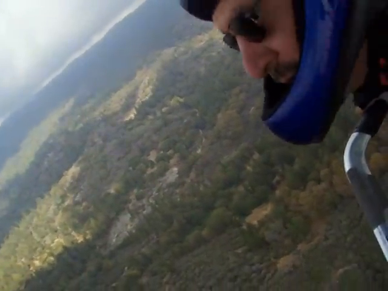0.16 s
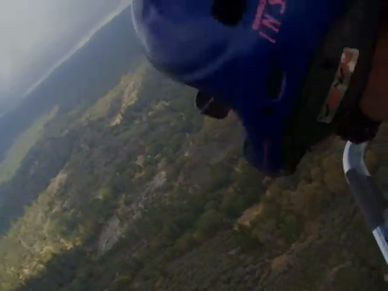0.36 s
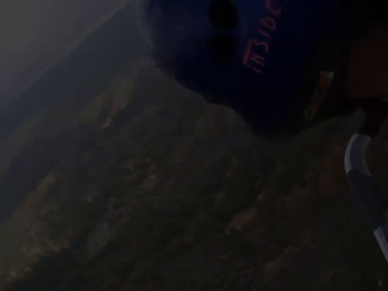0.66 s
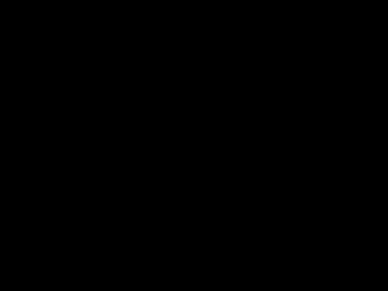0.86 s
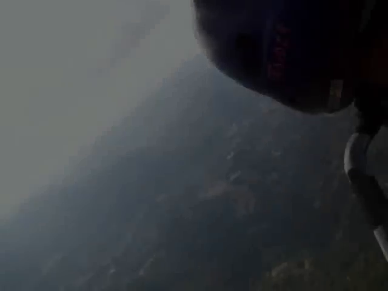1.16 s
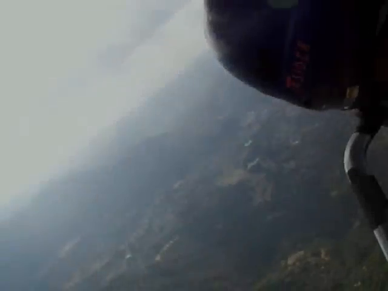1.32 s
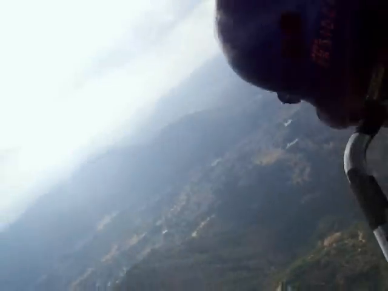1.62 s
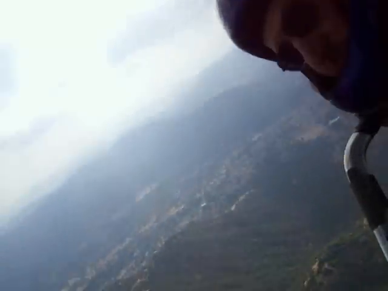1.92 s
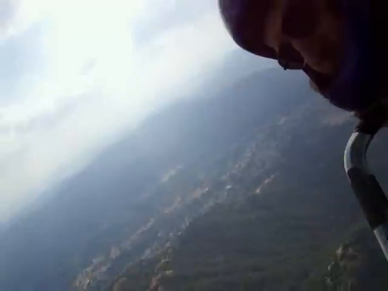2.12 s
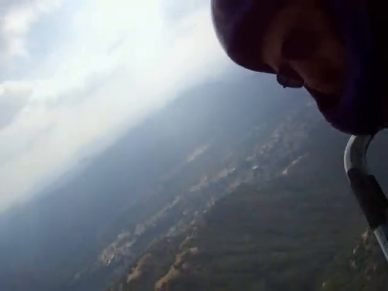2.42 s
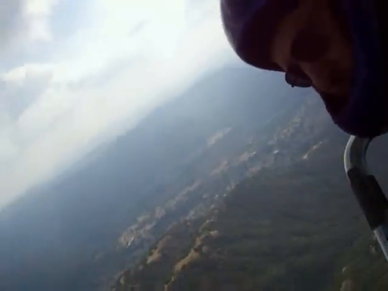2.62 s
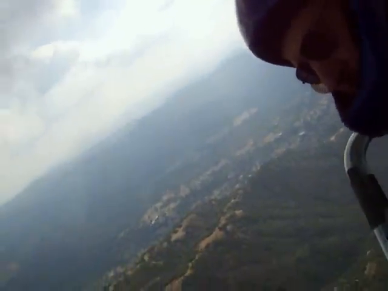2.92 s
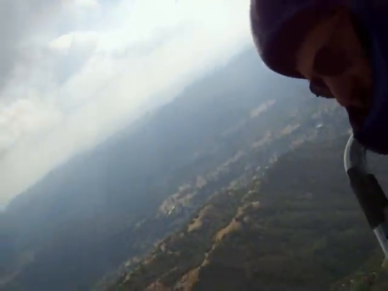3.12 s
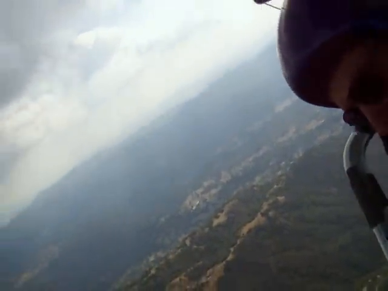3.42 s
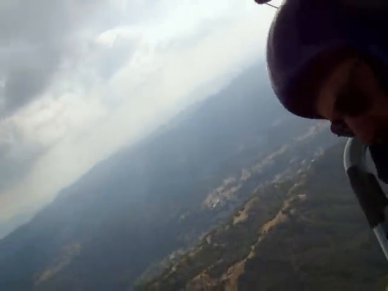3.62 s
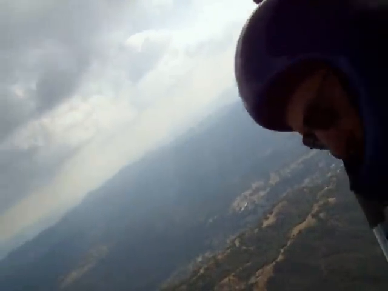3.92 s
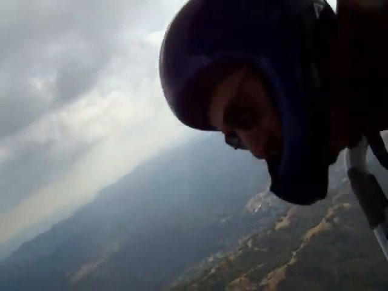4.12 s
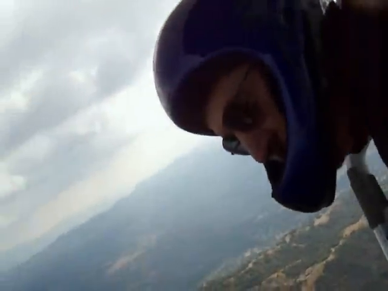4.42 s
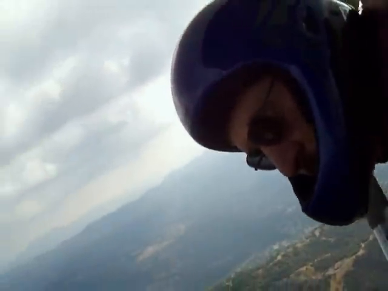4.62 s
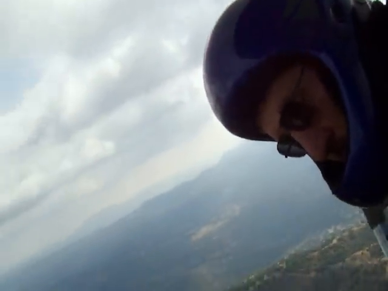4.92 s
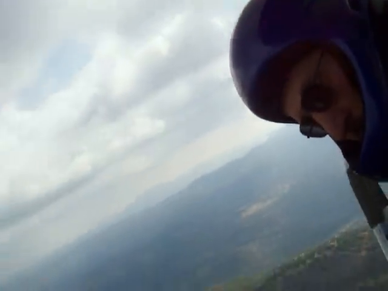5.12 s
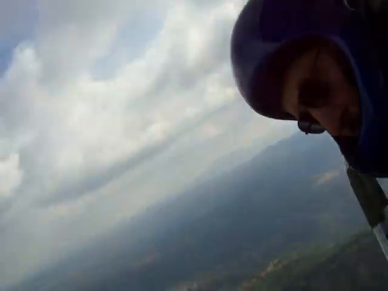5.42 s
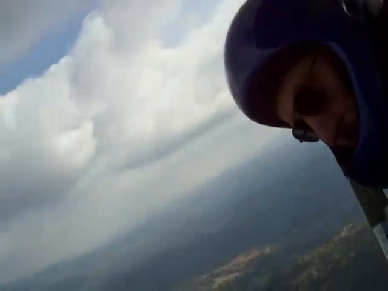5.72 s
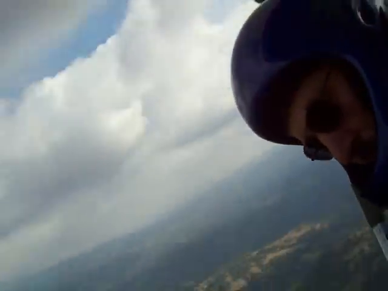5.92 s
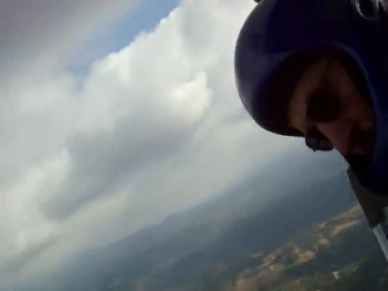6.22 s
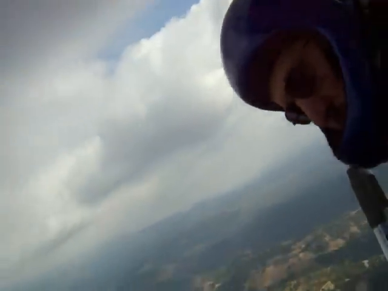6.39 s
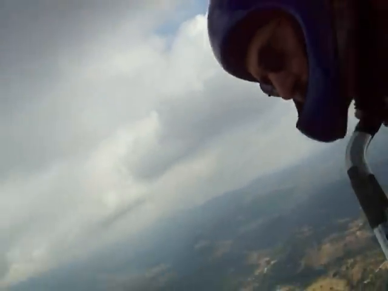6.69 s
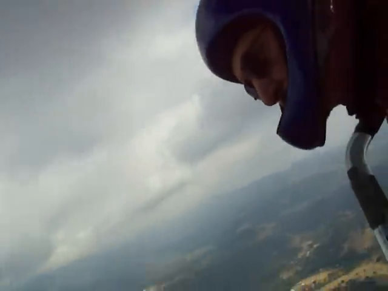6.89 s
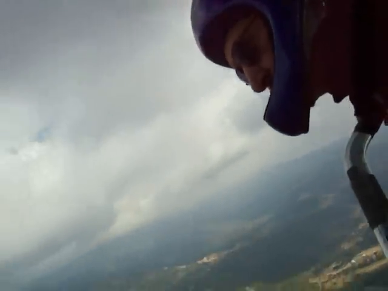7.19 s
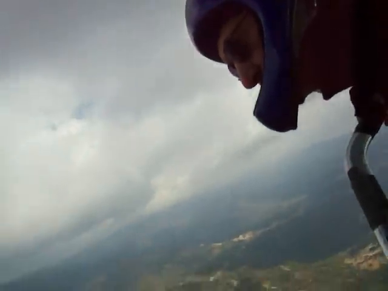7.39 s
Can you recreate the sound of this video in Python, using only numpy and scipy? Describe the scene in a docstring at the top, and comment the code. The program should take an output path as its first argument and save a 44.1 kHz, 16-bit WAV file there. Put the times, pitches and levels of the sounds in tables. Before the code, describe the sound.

Gusty airflow rumbles, rushes and hisses directly against a microphone on a hang glider in open air. Short hooting blips and occasional hard pops break through, with one dry tick early and a faint wire whistle after it. From about halfway the buffeting gets heavier and the pops crowd together, each momentarily choking the wind. A very short howl comes near the end, and the camera's faint high whine persists throughout.

```python
"""On a hang glider in flight, airflow buffets a camera's microphone: rumble, rush and hiss.
A rigging wire whistles faintly, one gust howls across a hollow of the housing, and there is one dry tick.
Eddies make the microphone port hoot for a few cycles, and the hardest ones slam the diaphragm.
Each slam chokes the microphone for an instant; on high peaks the gain control ducks the whole sound,
even the camera's thin whine, and swells back."""
import sys
import numpy as np
from scipy import signal
from scipy.fft import rfft, irfft, next_fast_len
from scipy.io import wavfile
from scipy.ndimage import minimum_filter1d, map_coordinates

SR = 44100
rng = np.random.default_rng(int(sys.argv[2]) if len(sys.argv) > 2 else 0)


def unload_wav(signal):
    """Save mono or channel-first audio to the path in sys.argv[1] as 16-bit WAV at rate SR, clipped to [-1, 1]."""
    wavfile.write(
        sys.argv[1],
        SR,
        np.round(np.clip(np.atleast_2d(signal).T, -1, 1) * 32767).astype(np.int16),
    )


N = 332955


def amp(db):
    """Amplitude ratio of a level in decibels."""
    return 10 ** (np.asarray(db) / 20)


def unit(x):
    """Normalisation to rms 1."""
    return x / np.sqrt(np.mean(x ** 2) + 1e-20)


def envelope(points):
    """Linear interpolation of (t/s, level/dB) points at every sample."""
    s, db = np.transpose(points)
    return np.interp(np.arange(N) / SR, s, db)


def swell(crest_s, length_s):
    """A raised-cosine window of height 1."""
    return np.cos(np.pi * np.clip((np.arange(N) / SR - crest_s) / length_s, -.5, .5)) ** 2


def wobble(rate_hz):
    """Smooth random modulation: a spline through rate_hz Gaussian values a second."""
    return map_coordinates(rng.standard_normal(N // 8), [np.arange(N) * rate_hz / SR])


def gain_at(points, hz):
    """Gain interpolated from (f/Hz, level/dB) points on a logarithmic frequency axis."""
    f, db = np.transpose(points)
    return amp(np.interp(np.log(hz + 1), np.log(f), db))


def filtered(x, response):
    """Zero-phase filtering: the spectrum of x times a frequency response."""
    size = next_fast_len(N + SR // 2)
    return irfft(rfft(x, size) * response(np.fft.rfftfreq(size, 1 / SR)), size)[:N]


def noise(spectrum):
    """White noise shaped to a spectrum, at rms 1."""
    return unit(filtered(rng.standard_normal(N), lambda hz: gain_at(spectrum, hz)))


def add(track, s, sound):
    """Superposition of a sound on the track from s seconds on."""
    part = track[max(round(s * SR), 0):][:len(sound)]
    part += sound[:len(part)]


# strength of the electronic whine: t/s, level/dB
WHINE_ENVELOPE = [(4.2, -41.5), (7.55, -46)]
def whine(hz=8078):
    """A pure tone of constant frequency from the camera's electronics."""
    return amp(envelope(WHINE_ENVELOPE)) * np.sin(2 * np.pi * hz * np.arange(N) / SR)


def tick(at_s=0.98, peak_db=-21, decay_s=.0003):
    """A step with rapid exponential decay, heard as one dry tick."""
    track = np.zeros(N)
    t = np.arange(SR // 128) / SR
    add(track, at_s, amp(peak_db) * np.exp(-t / decay_s))
    return track


def wire_whistle(centre_hz=1352, width_hz=29, level_db=-39.5):
    """Aeolian tone: vortex shedding from a rigging wire gives a narrow band of noise."""
    note = filtered(rng.standard_normal(N), lambda hz: np.exp(-((hz - centre_hz) / width_hz) ** 2 / 2))
    return amp(level_db) * swell(crest_s=2.9, length_s=4.6) * unit(note)


# notes of the hollow in the housing: f/Hz, level/dB
CAVITY_NOTES = [(640, -17.5), (1025, -21.5), (1660, -33)]
def cavity_howl(pitch_waver=0.0205, rough_db=3.5):
    """Cavity resonance: one gust across a hollow of the housing sustains a few unsteady notes."""
    notes = np.zeros(N)
    for hz, db in CAVITY_NOTES:
        phase = 2 * np.pi * np.cumsum(hz * (1 + pitch_waver * wobble(120))) / SR
        notes += amp(db + rough_db * wobble(140)) * np.sin(phase)
    return swell(crest_s=6.333, length_s=.095) * notes


# gusts: crest t/s, length/s, added wind level/dB, further rush level/dB
GUST_SWELLS = [(0.415, 0.49, 2.5, -1), (2.536, 0.099, 3.5, 0.5), (3.953, 0.25, 1.5, 0.5),
               (4.685, 0.13, 5, 2), (5.134, 0.12, 3, -1), (6.19, 0.3, 2.5, -0.5), (6.335, 0.1, 0.7, 2.7),
               (6.728, 0.095, 1, -2.5), (6.967, 0.23, 4.5, -2), (7.407, 0.5, 5, -1.5)]
def gusts(surge_db=1.3, surge_s=0.12):
    """Flow noise grows with air speed: dB added to all wind by gusts and slams, and to the rush alone."""
    gust_db = sum(db * swell(s, length) for s, length, db, _ in GUST_SWELLS)
    surges = sum(swell(s, surge_s) for s, _, _ in EDDY_IMPACTS)  # each slam rides on a swell of air
    extra_rush_db = sum(db * swell(s, length) for s, length, _, db in GUST_SWELLS)
    return gust_db + surge_db * surges, extra_rush_db


# spectral densities of turbulence, from the largest eddies to the finest: f/Hz, relative level/dB
BUFFET_SPECTRUM = [(12, -22), (25, -5), (60, -1.5), (120, -1), (200, -3.5), (300, -6), (450, -11),
                   (700, -25.5), (1500, -49.5)]
THROB_SPECTRUM = [(90, -25), (160, -4), (230, -0.5), (330, -3), (450, -7), (800, -48)]
RUSH_SPECTRUM = [(200, -53), (400, -3), (550, 0.5), (750, -1.5), (1000, -4.5), (1250, -11), (1600, -16),
                 (2500, -28.5), (5000, -68)]
HISS_SPECTRUM = [(700, -16.5), (1500, -1.5), (2300, 0), (3100, -0.5), (3900, -4), (4700, -6.5), (5600, -13),
                 (7000, -25), (11000, -18)]
SIZZLE_SPECTRUM = [(2500, -25), (4000, 1), (4800, 4.5), (5600, 0.5), (6400, 8.5), (7100, 6), (8000, 3),
                   (11000, -9.5)]
# airflow relative to cruising: t/s, level/dB
FLOW_ENVELOPE = [(0, 3), (.16, -1.5), (.7, -2), (1.05, -0.5), (1.3, -1.5), (1.58, 0), (2.2, -1), (2.9, 1.3),
                 (3.55, 0.5), (4.25, 1), (5.0, 1.5), (5.4, 4), (6.6, 1.5), (7.55, -2.5)]
# low buffeting, before gusts: t/s, level/dB
BUFFET_ENVELOPE = [(0, -16.5), (.4, -18), (.8, -16), (1.4, -19.5), (2.4, -17.5), (3.2, -18.5),
                   (3.85, -16.5), (4.05, -18), (4.2, -13.5), (4.36, -14), (4.48, -17.5), (4.67, -14.5),
                   (4.8, -16.5), (5.02, -18), (5.13, -14), (5.3, -15), (6.2, -16), (6.7, -18), (7.55, -21)]
# sizzle relative to the hiss: t/s, level/dB
SIZZLE_ENVELOPE = [(0, -9), (.42, -6), (.62, -9), (.95, -9), (1.1, -5.5), (1.3, -14), (1.54, -5.5),
                   (2.25, -10), (2.52, -9), (3.15, -7), (3.7, -6), (3.95, -4), (4.28, -12), (4.75, -3.5),
                   (7.55, -2.5)]
def wind(cruise_rush_db=-24, cruise_hiss_db=-34.5):
    """Turbulence: large eddies rumble, smaller ones rush, the finest hiss in time with the large ones."""
    flow_db = envelope(FLOW_ENVELOPE)
    buffet_db = envelope(BUFFET_ENVELOPE)
    gust_db, extra_rush_db = gusts()
    flutter = wobble(45)  # passing eddies shake all layers at once
    pressure = noise(BUFFET_SPECTRUM)
    buffet = amp(buffet_db) * unit(pressure * amp(1.3 * flutter))
    throb_db = 7.5 + 2.22 * buffet_db  # grows faster, so hard buffeting rises in pitch
    throb = amp(throb_db) * unit(noise(THROB_SPECTRUM) * amp(2.0 * flutter))
    rush_db = cruise_rush_db + 0.79 * flow_db + extra_rush_db
    rush = amp(rush_db) * unit(noise(RUSH_SPECTRUM) * amp(0.14 * flutter + 0.62 * wobble(160)))
    pulsing = amp(0.94 * flutter + pressure)
    hiss = unit(noise(HISS_SPECTRUM) * pulsing)
    sizzle = amp(envelope(SIZZLE_ENVELOPE)) * unit(noise(SIZZLE_SPECTRUM) * pulsing)
    treble = amp(cruise_hiss_db + flow_db) * (hiss + sizzle)
    return amp(gust_db) * (buffet + throb + rush + treble)


# eddies that blow the port like a bottle: t/s, peak level/dB, f/Hz, number of puffs, puff spacing/s
PORT_EDDIES = [(.2863, -13, 1000, 1, .004), (0.2908, -11.5, 1050, 2, 0.0031), (.3511, -15, 1030, 2, .0031),
               (.4139, -11, 990, 3, .0042), (.4576, -9.5, 980, 2, .0046), (1.5402, -9, 1010, 2, 0.0029),
               (1.5905, -14, 970, 1, .004), (1.9115, -10, 1050, 2, .0039), (2.5054, -14, 1020, 2, .0039),
               (2.5125, -9, 1050, 1, .004), (2.5366, -7.5, 1005, 2, .005), (2.5405, -9, 650, 2, 0.00444),
               (2.8404, -8.5, 1040, 2, 0.00303), (3.345, -11, 970, 2, .0042), (3.7452, -10, 940, 1, .004),
               (3.9147, -14, 1080, 3, 0.00337), (3.9341, -15, 950, 2, .0033),
               (4.077, -14.5, 1020, 3, .0039), (5.8865, -15, 680, 1, .004), (6.18, -14, 1000, 1, .004),
               (6.2971, -12, 950, 2, .0038), (6.7204, -13.5, 1020, 2, .0042), (7.3695, -18, 700, 1, .004)]
def port_hoots(rise_s=.0013, scatter_db=1.5, scatter_s=.00005):
    """Helmholtz resonance: each puff rings the port for about three cycles, with hiss on each crest."""
    ring = np.zeros(N)
    t = np.arange(SR // 64) / SR
    shape = (t / rise_s) ** 2 * np.exp(2 - 2 * t / rise_s)
    for s, db, hz, count, gap in PORT_EDDIES:
        for k in range(round(count)):
            late, louder = rng.standard_normal(2)
            puff = amp(db + scatter_db * louder) * shape * np.sin(2 * np.pi * hz * t)
            add(ring, s + k * gap + scatter_s * late, puff)
    spit = 0.75 * noise(HISS_SPECTRUM) + 1.4 * rng.standard_normal(N)
    return ring + amp(-16) * np.maximum(ring, 0) * spit


# eddies that hit the diaphragm: t/s, peak level of the kick/dB, rise time of the front/s
EDDY_IMPACTS = [(0.2136, 3.5, .001), (2.3561, 7, .0004), (3.5138, 7, 0.00099), (3.7745, 3.5, 0.0013),
                (4.4, -1.2, .001), (4.4786, 7.5, 0.00056), (4.729, -2, .0008), (4.8184, 8, 0.00038),
                (5.008, -0.7, .0006), (5.199, 1, 0.0005), (5.3342, 4.2, .0008), (5.492, -2, .001),
                (5.6769, 7, 0.0013), (5.961, 7.2, 0.0007), (6.433, 7, 0.00052), (6.6051, 6.5, .0005),
                (6.7555, 5.5, 0.00065), (6.9494, 3.5, 0.00046), (7.1108, 4, 0.00039),
                (7.452, -2.3, 0.00071)]
def slams(suction_s=0.0016, leak_s=0.0022, crack_s=0.00044):
    """Pressure transients: brief suction, then a kick that leaks away; steeper fronts crack more."""
    track, lead = np.zeros(N), SR // 128
    t = (np.arange(SR // 32) - lead) / SR
    after = np.maximum(t, 0)
    for s, db, rise_s in EDDY_IMPACTS:
        front = 1 - np.exp(-(after / rise_s) ** 2)
        suction = (front - 1) * np.exp(-(t / suction_s + .5) ** 2)  # the core pulls before it pushes
        kick = front * np.exp(-after / leak_s)
        bright_noise = np.diff(rng.standard_normal(len(t) + 1))
        crack = (crack_s / rise_s) ** 2 * np.exp(-(t / crack_s + .5) ** 2) * bright_noise
        add(track, s - lead / SR, amp(-8) * suction + amp(db) * kick / kick.max() + amp(-17) * crack)
    return track


def choke(threshold_db=-4, loss_per_db=0.2, onset_s=0.0041, pinned_s=0.01):
    """Overload: each slam pins the diaphragm for a moment, which lowers its gain for the wind."""
    loss_db = np.zeros(N)
    t = np.arange(SR // 16) / SR
    pinned = (1 - np.exp(-(t / onset_s) ** 4)) * np.exp(-(t / pinned_s) ** 2)
    for s, db, _ in EDDY_IMPACTS:
        add(loss_db, s, loss_per_db * (db - threshold_db) * pinned)
    return amp(-loss_db)


def scene():
    """Superposition of the sources at one microphone."""
    airflow = wind() + wire_whistle() + cavity_howl()
    return (choke() * airflow + port_hoots() + slams() + whine())[None]


def gain_control(x, ceiling_db=-3.0, overshoot=1.3, attack_s=0.00004, hold_s=0.011, release_db_per_s=118):
    """Peak limiting: over the ceiling the gain drops a little too far, holds, then recovers steadily."""
    level_db = 20 * np.log10(np.abs(x) + 1e-9)
    demand_db = overshoot * np.maximum(level_db - ceiling_db, 0)
    span = round(hold_s * SR)
    held_db = -minimum_filter1d(-demand_db, span, origin=(span - 1) // 2)  # trailing maximum
    climb_db = release_db_per_s * np.arange(N) / SR
    cut_db = np.maximum.accumulate(held_db + climb_db) - climb_db
    pole = np.exp(-1 / (attack_s * SR))
    return x * amp(-signal.lfilter([1 - pole], [1, -pole], cut_db))


# frequency response of the camera: f/Hz, level/dB
CAMERA_RESPONSE = [(5, -28), (22, 0), (7100, -1.5), (7900, -8), (8700, -10.5), (9700, -11), (10800, -19.5),
                   (11100, -15.5)]
def record(dry, saturation=.8, mic_top_hz=11100, band_top_hz=15800):
    """The signal chain: gain control, soft clipping, the camera's response, a tick, the band limit."""
    limited = gain_control(dry[0])
    rounded = limited / (1 + (limited / saturation) ** 6) ** (1 / 6)
    coloured = filtered(rounded, lambda hz: gain_at(CAMERA_RESPONSE, hz) * (hz < mic_top_hz))
    return filtered(coloured + tick(), lambda hz: hz < band_top_hz)[None]


dry = scene()
out = record(dry)
unload_wav(out)
```